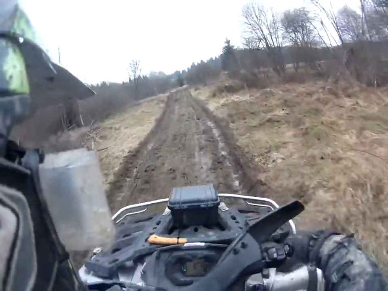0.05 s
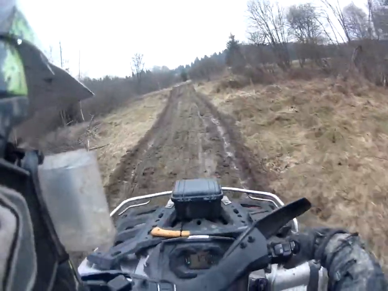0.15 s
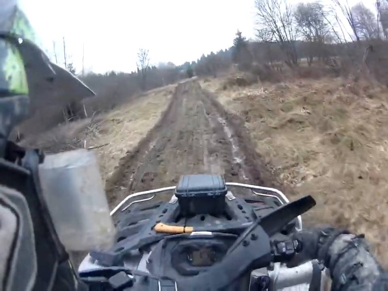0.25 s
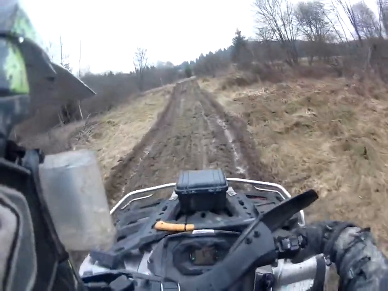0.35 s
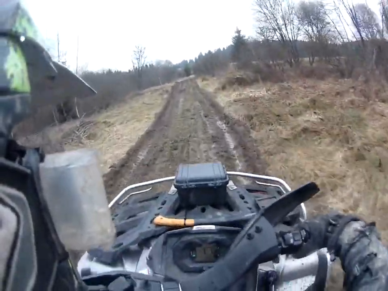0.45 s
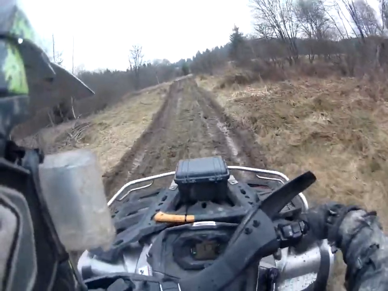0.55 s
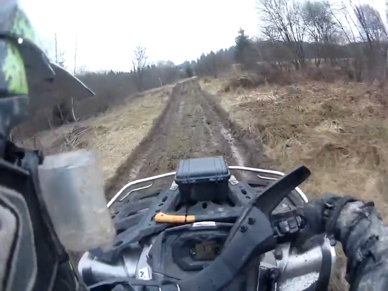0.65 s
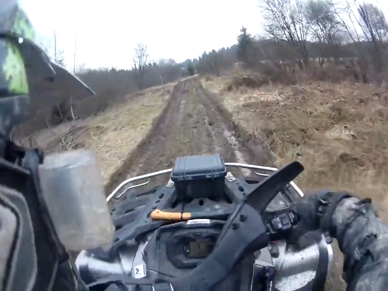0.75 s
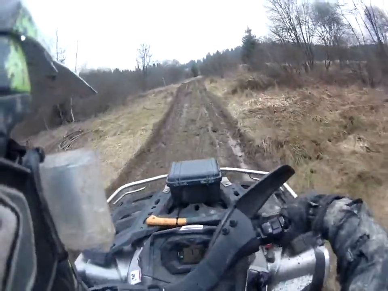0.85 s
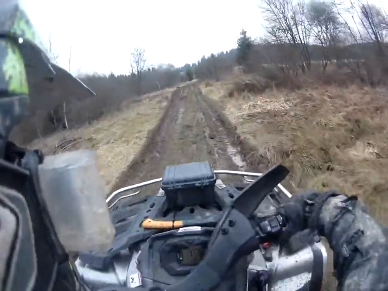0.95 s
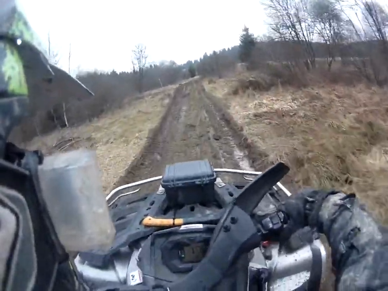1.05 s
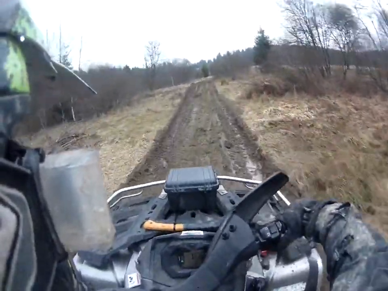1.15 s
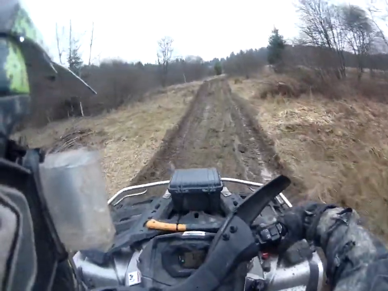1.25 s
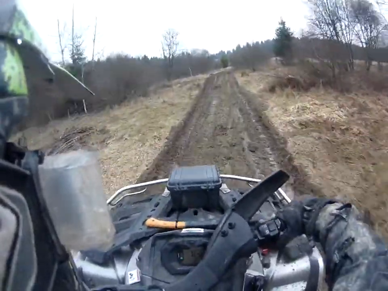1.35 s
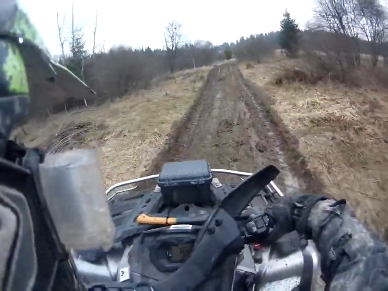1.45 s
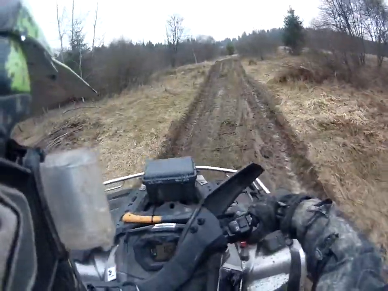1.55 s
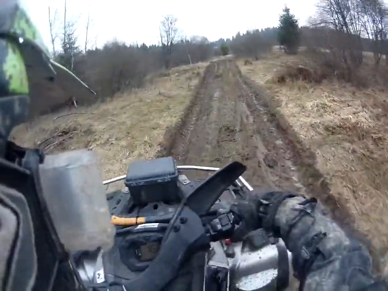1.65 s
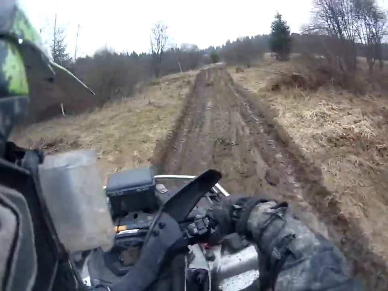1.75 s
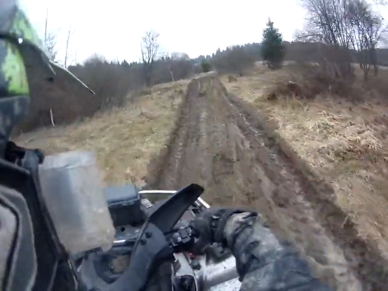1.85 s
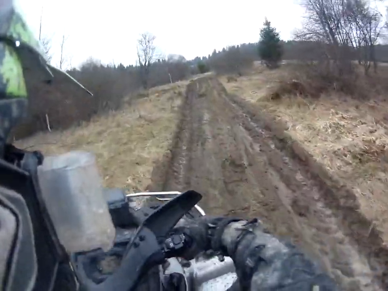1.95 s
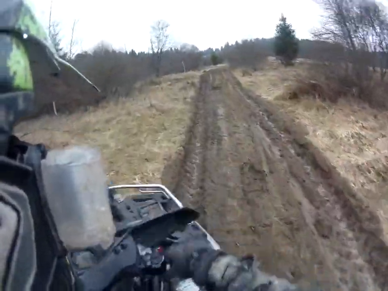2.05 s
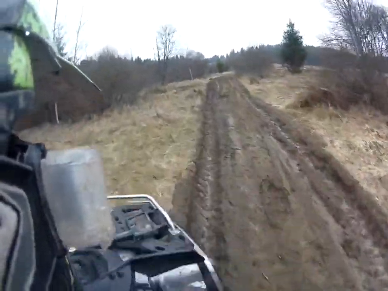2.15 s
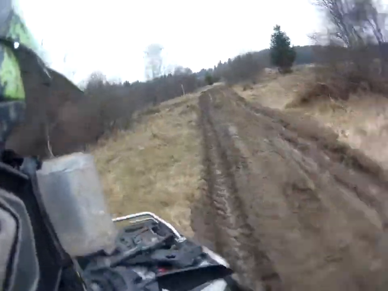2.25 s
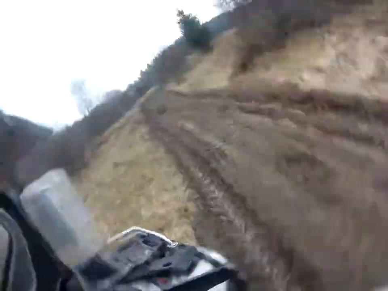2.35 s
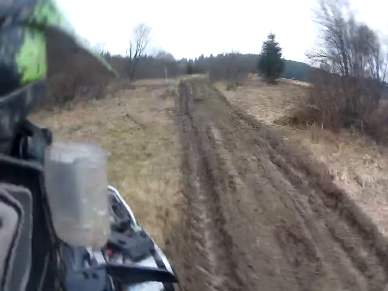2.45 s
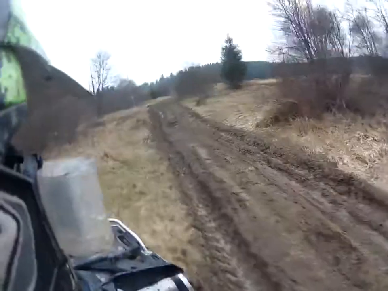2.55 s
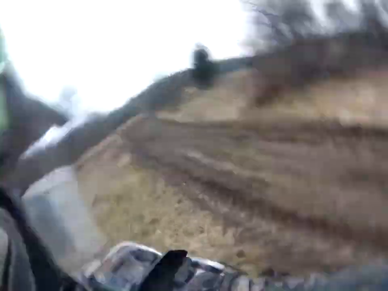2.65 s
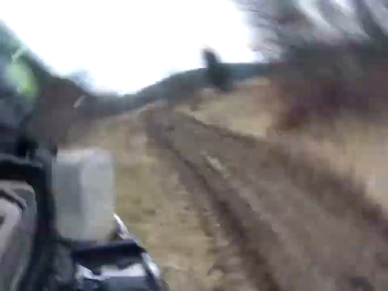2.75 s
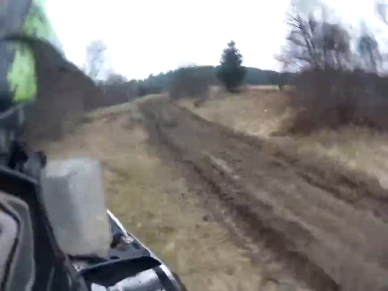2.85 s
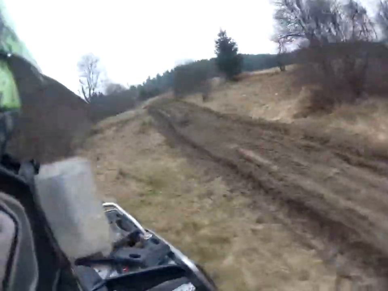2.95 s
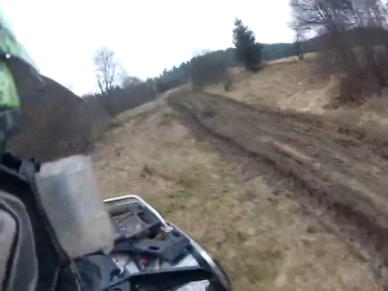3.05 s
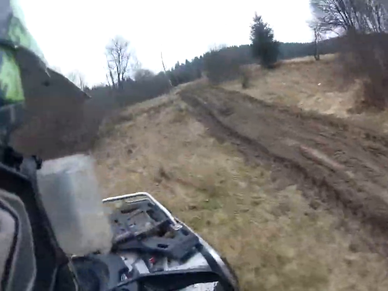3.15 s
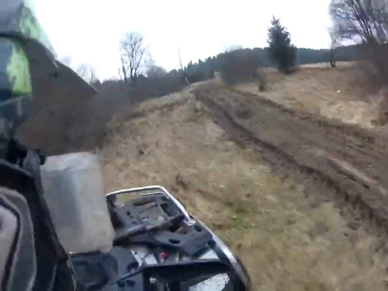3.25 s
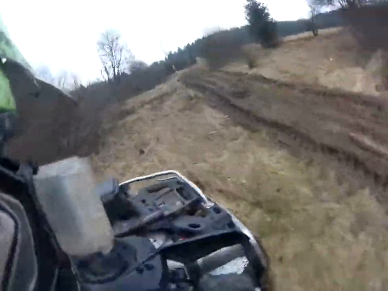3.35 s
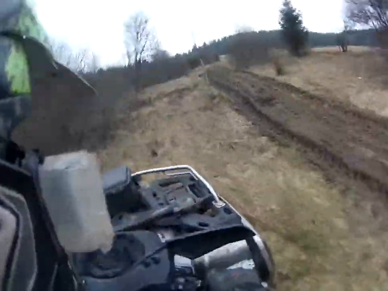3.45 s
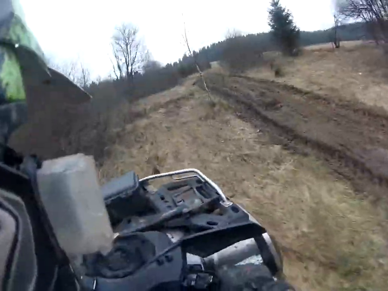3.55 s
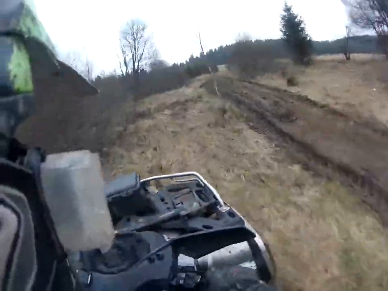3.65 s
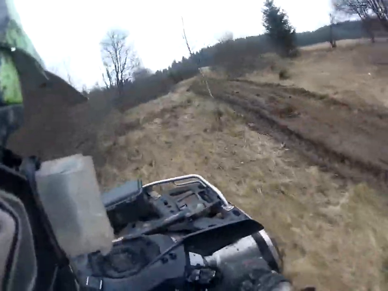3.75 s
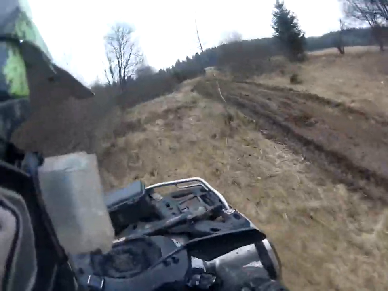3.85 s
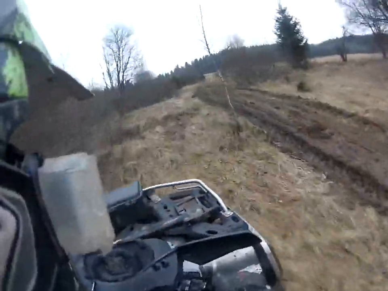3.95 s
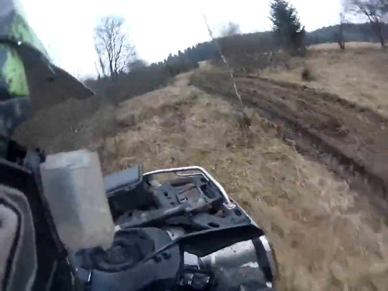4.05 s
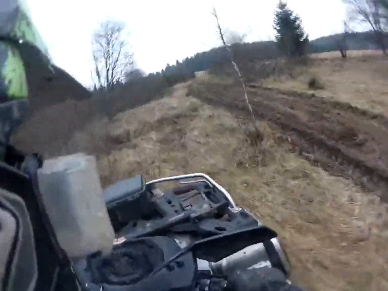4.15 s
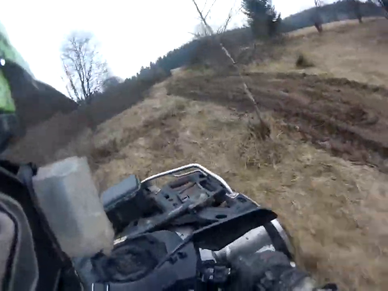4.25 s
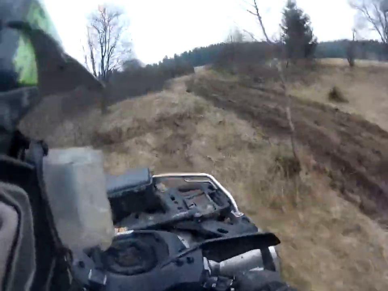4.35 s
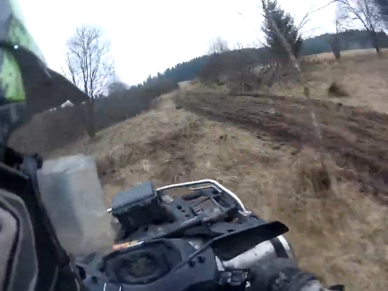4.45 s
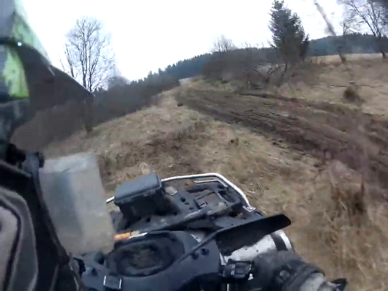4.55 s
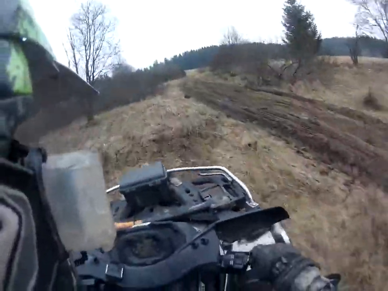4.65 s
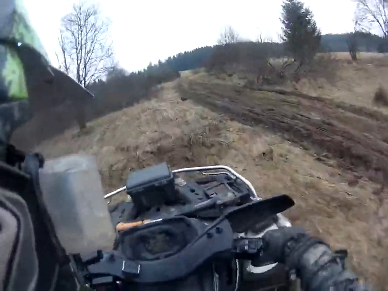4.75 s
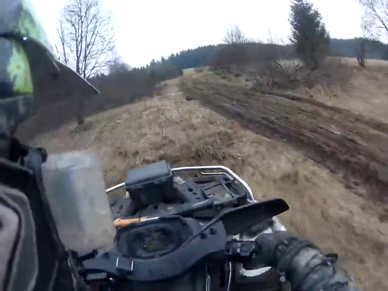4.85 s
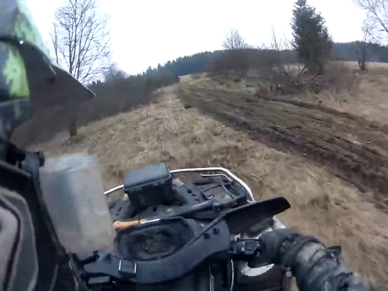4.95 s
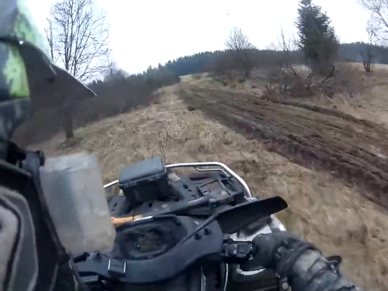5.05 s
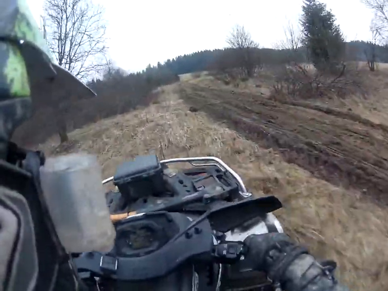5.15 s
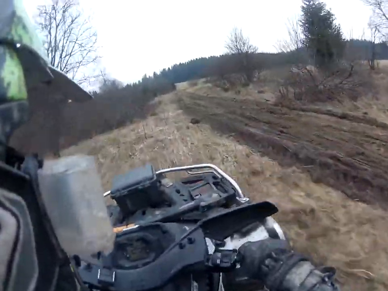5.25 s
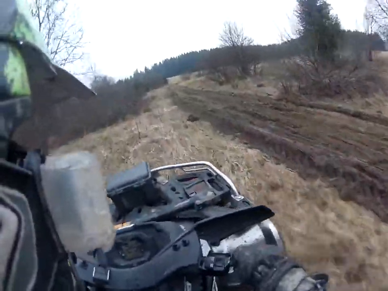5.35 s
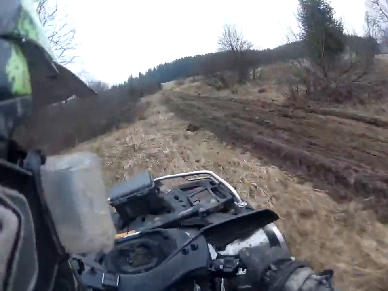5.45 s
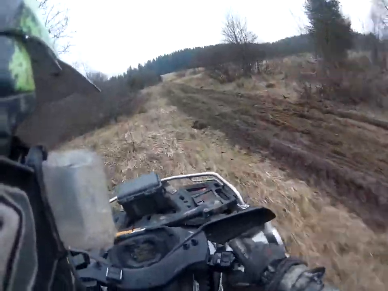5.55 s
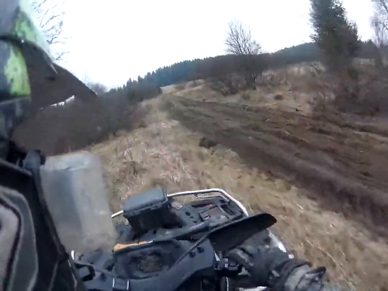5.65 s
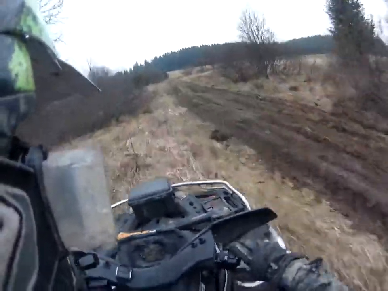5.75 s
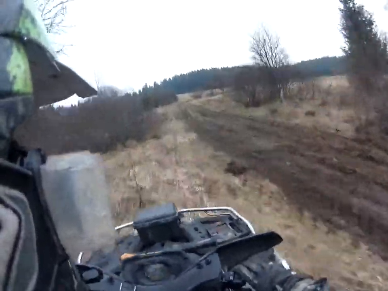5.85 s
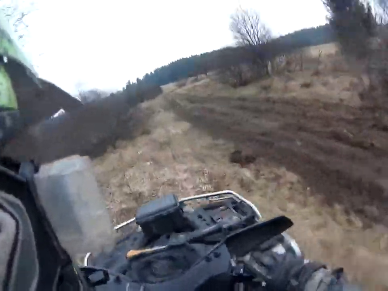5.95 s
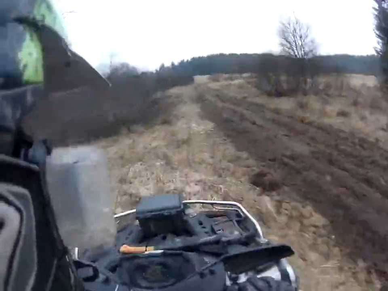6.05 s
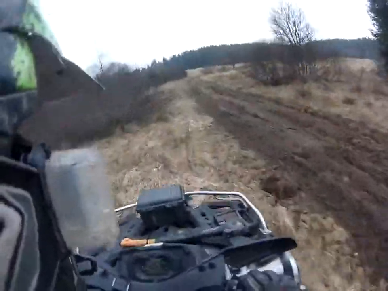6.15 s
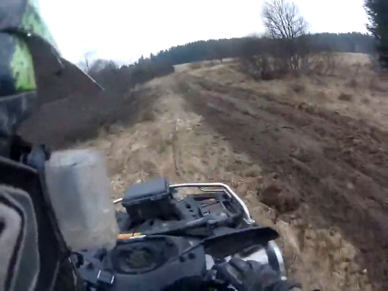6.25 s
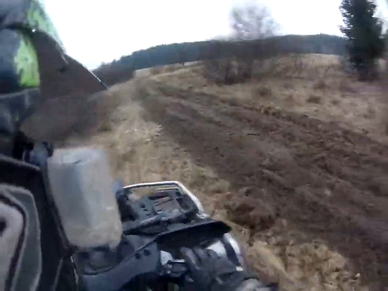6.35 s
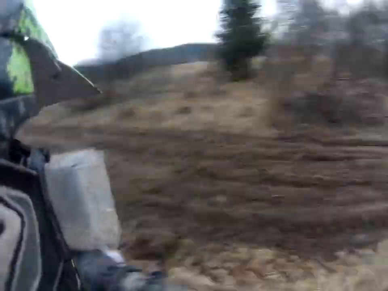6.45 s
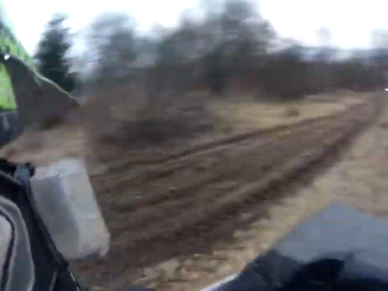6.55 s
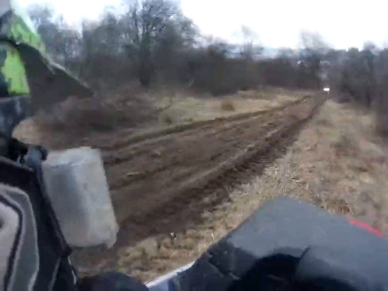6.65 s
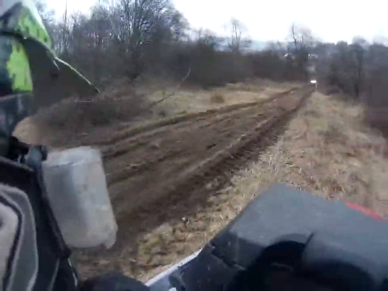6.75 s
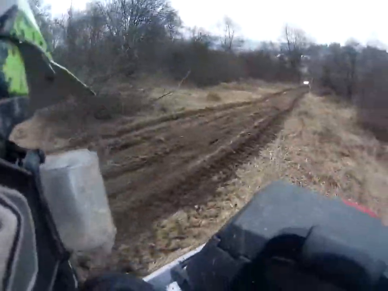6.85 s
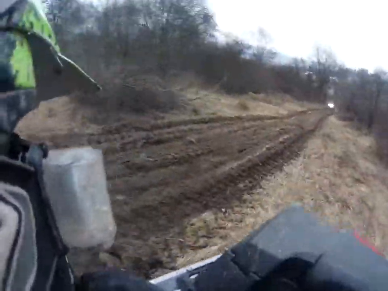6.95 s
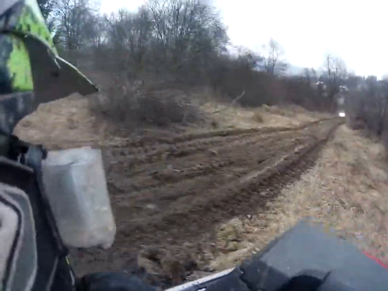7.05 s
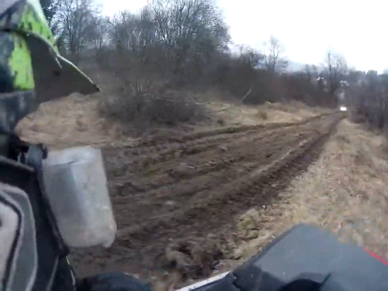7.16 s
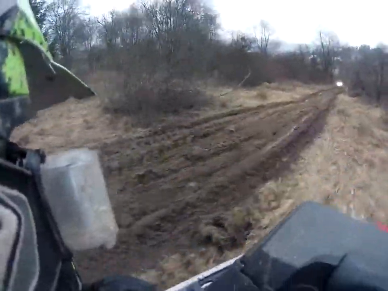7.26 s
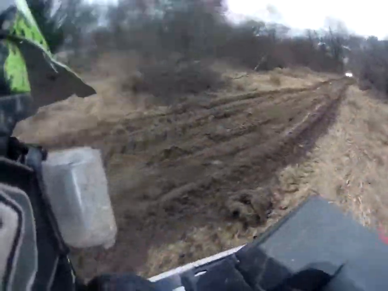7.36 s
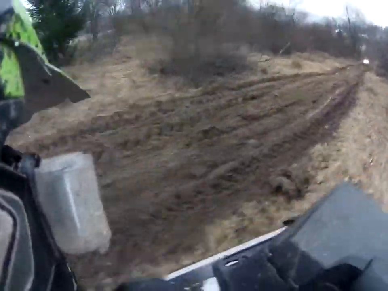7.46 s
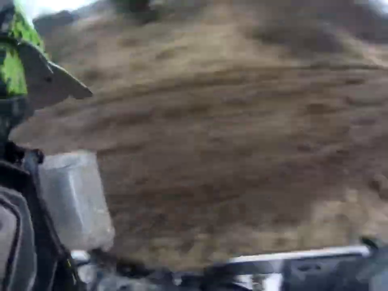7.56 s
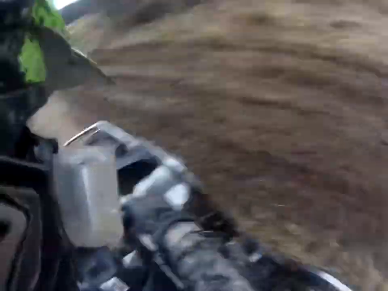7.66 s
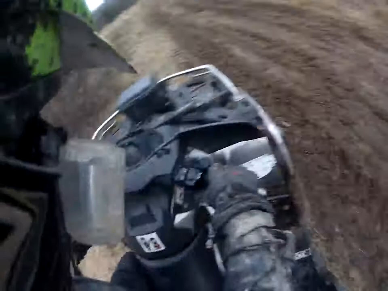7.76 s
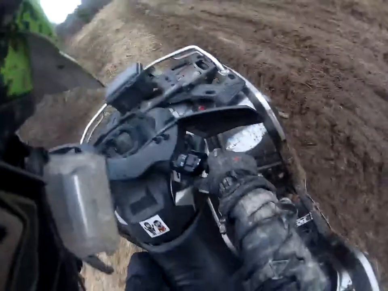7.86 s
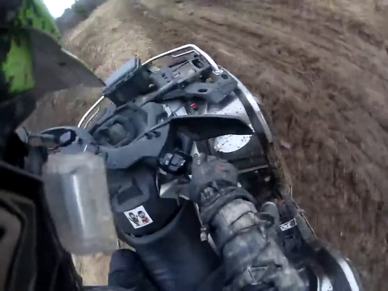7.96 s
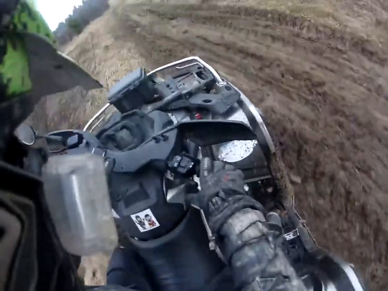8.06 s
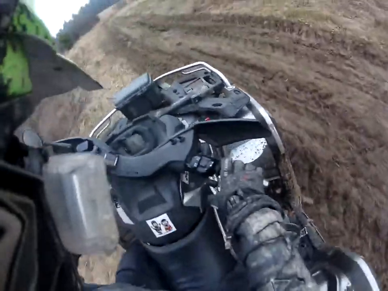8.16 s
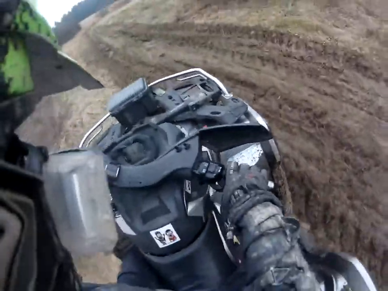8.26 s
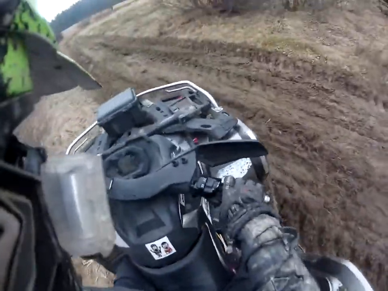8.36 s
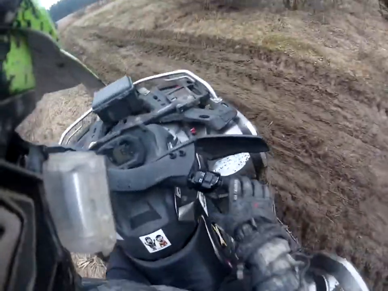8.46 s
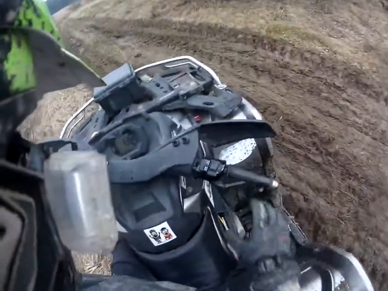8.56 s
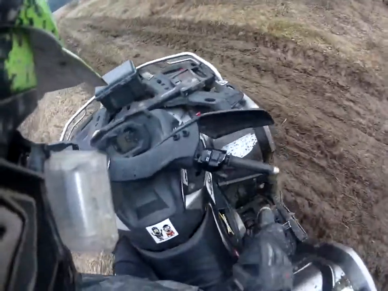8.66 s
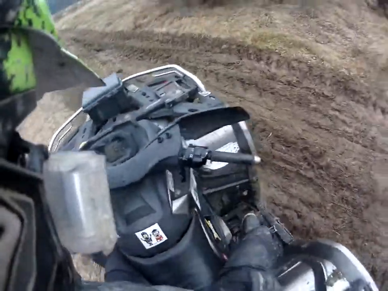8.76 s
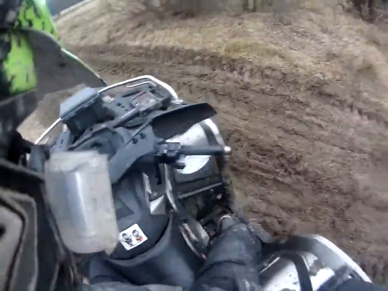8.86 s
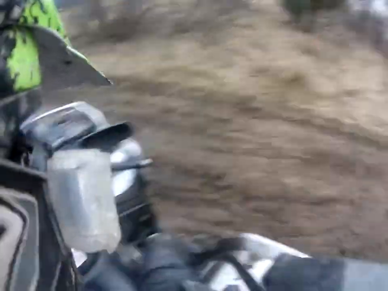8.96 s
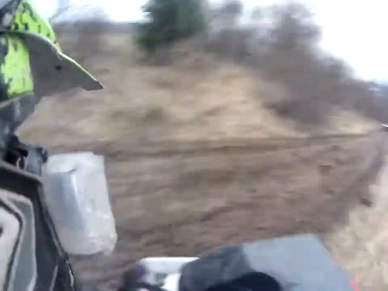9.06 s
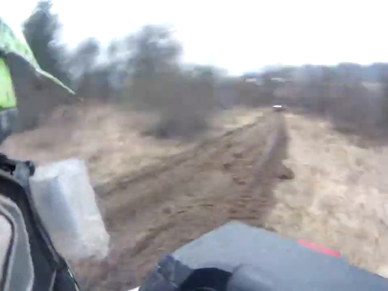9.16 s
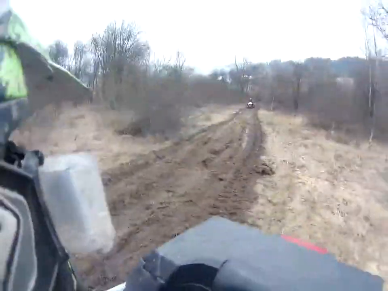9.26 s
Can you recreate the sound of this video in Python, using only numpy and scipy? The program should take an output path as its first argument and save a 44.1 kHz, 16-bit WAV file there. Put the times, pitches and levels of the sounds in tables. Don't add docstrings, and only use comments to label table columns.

```python
import sys
import numpy as np
from scipy import signal
from scipy.fft import irfft, next_fast_len
from scipy.io import wavfile
from scipy.ndimage import uniform_filter1d

SR = 44100
rng = np.random.default_rng(int(sys.argv[2]) if len(sys.argv) > 2 else 0)


def output_pcm(signal):
    pcm = np.clip(np.atleast_2d(signal).T, -1, 1) * 32767
    wavfile.write(sys.argv[1], SR, np.round(pcm).astype(np.int16))


def gain_from_decibels(decibels):
    exponent = np.asarray(decibels, float) / 20
    return 10 ** exponent


N = 410130
STEP = 16
TIME = np.arange(N) / SR
BLOW = 1500

# (t/s, f/Hz)
SPEED = [(0, 33.4), (1.1, 32.1), (2, 32.5), (2.8, 35), (3.15, 36.9), (3.5, 40.6), (4.3, 39.3), (4.9, 39.3),
         (5.2, 41), (5.4, 40.55), (5.9, 26.6), (6.6, 19.2), (6.9, 20.1), (7.15, 24.5), (7.77, 23.6),
         (8.15, 15.7), (8.5, 12.6), (9.3, 11.35)]


def evened(x):
    return x / np.sqrt(np.mean(abs(x) ** 2) + 1e-20)


def read(points, hz):
    f, value = np.transpose(points)
    return np.interp(np.log(hz + 1), np.log(f + 1), value)


def play(rows, t):
    s, *columns = np.transpose(rows)
    return [np.interp(t, s, c) for c in columns]


def wandering(t, per_unit=1):
    return np.interp(t, np.arange(1000) / per_unit, rng.standard_normal(1000))


def noise(colour):
    size = next_fast_len(N)
    hz = np.fft.rfftfreq(size, 1 / SR)
    top_hz = min(colour[-1][0], 15330)
    inside = (hz > colour[0][0]) & (hz < top_hz)
    a, b = rng.standard_normal((2, len(hz)))
    return evened(irfft((a + 1j * b) * gain_from_decibels(read(colour, hz)) * inside, size)[:N])


def converter_hiss():
    # (f/Hz, level/dB per Hz)
    hiss_colour = [(300, -14.5), (2000, -2), (4000, 1), (9000, 0.5), (12000, 1.5), (16500, -2)]
    return gain_from_decibels(-69.5) * np.array([noise(hiss_colour), noise(hiss_colour)])


def preamp_hiss():
    # (t/s, level/dB)
    card_writes = [(.52, -79), (1.22, -70), (1.52, -74), (1.72, -71), (2.02, -74), (3.22, -70), (3.72, -70),
                   (4.92, -70), (5.22, -76), (5.991, -73), (6.22, -72), (6.52, -77), (6.79, -76),
                   (7.02, -71), (7.22, -71), (7.52, -81), (7.8, -71), (8.1, -71), (8.22, -71), (8.63, -70),
                   (8.72, -75), (9.031, -70)]
    t = TIME[::STEP]
    bursts = sum(gain_from_decibels(db) * np.exp(-((t - s - .01) / 0.012) ** 4) for s, db in card_writes)
    level = gain_from_decibels(-67) + np.interp(TIME, t, bursts)
    colour = [(1500, -1.5), (3500, 3.5), (6000, -1.5), (9000, -3.0), (12000, -7.0), (16500, -7)]
    return level * noise(colour)


def electronic_whine():
    whine_hz, whine_db, frame_hz, frame_db = 10519, -76, 59.94, -22
    t = TIME[::STEP]
    frames = sum(2 * gain_from_decibels(frame_db) * np.cos(2 * np.pi * k * (frame_hz * t + k / 7)) for k in range(1, 7))
    swing = 1 + np.interp(TIME, t, frames)
    return np.sqrt(2) * gain_from_decibels(whine_db) * swing * np.sin(2 * np.pi * whine_hz * TIME)


def tones(rows, waver, flutter_db, per_s):
    out = np.zeros(N)
    fade_s, swell_db = .1, 2
    for start, end, first_hz, last_hz, db in rows:
        span = slice(max(round((start - fade_s) * SR), 0), round((end + fade_s) * SR))
        t = TIME[span]
        fade = np.interp(t, [start - fade_s, start, end, end + fade_s], [0, 1, 1, 0])
        hz = np.interp(t, [start, end], [first_hz, last_hz]) * (1 + waver * wandering(t, per_s))
        arch_db = -swell_db * (2 * (t - start) / (end - start) - 1) ** 2
        level = np.sqrt(2) * gain_from_decibels(db + arch_db + flutter_db * wandering(t, per_s))
        out[span] += level * fade * np.sin(2 * np.pi * np.cumsum(hz) / SR)
    return out


def hums():
    # (start t/s, end t/s, first f/Hz, last f/Hz, level/dB)
    hum_rows = [
        (4.3, 5.8, 354, 356, -55.5),
        (6, 6.5, 356, 354, -49),
        (6.6, 7.75, 353, 353, -53.5),
        (7.8, 8.9, 352, 352, -49.5),
        (9, 9.4, 352, 352, -57),
        (8.2, 8.8, 268, 272, -59),
        (8.85, 9.4, 276, 284, -54.5),
    ]
    return tones(hum_rows, waver=0.0024, flutter_db=0.46, per_s=40)


def buzzes():
    # (start t/s, end t/s, first f/Hz, last f/Hz, level/dB)
    buzz_rows = [(0, 0.18, 1344, 1340, -65), (.38, 0.68, 1340, 1330, -63), (.75, 1.1, 1314, 1314, -65),
                 (1.25, 1.6, 1355, 1380, -67), (1.3, 1.9, 1280, 1296, -62), (2.9, 3, 855, 863, -55.5),
                 (3.4, 4.9, 1312, 1320, -63.5), (5, 5.1, 1330, 1340, -58.5), (4.11, 4.14, 694, 675, -45),
                 (4.32, 4.34, 660, 673, -48), (8, 9.3, 520, 543, -64), (0, 1.8, 1325, 1360, -62.5),
                 (1.03, 1.08, 1323, 1335, -57), (3.7, 4.9, 1880, 1880, -66), (4.2, 5.15, 2480, 2430, -74),
                 (7.9, 8.4, 720, 724, -65.5)]
    return tones(buzz_rows, waver=.018, flutter_db=4, per_s=70)


def whines():
    # (start t/s, end t/s, first f/Hz, last f/Hz, level/dB)
    whine_rows = [(3.25, 3.37, 1555, 1565, -61), (3.42, 3.55, 1605, 1635, -63),
                  (3.62, 3.97, 1605, 1572, -60), (4.02, 4.1, 1575, 1620, -63), (4.8, 5.1, 1640, 1705, -61),
                  (5.15, 5.4, 1718, 1700, -57), (3.6, 3.85, 2400, 2390, -72), (4.24, 4.35, 2420, 2500, -70),
                  (4.45, 5.1, 2530, 2490, -71), (4.75, 4.95, 2400, 2410, -65.5),
                  (4.45, 4.75, 1730, 1725, -65), (3.45, 3.6, 1710, 1715, -65),
                  (7.36, 7.43, 1640, 1670, -66), (3.75, 5.45, 1850, 1875, -70)]
    return gain_from_decibels(0.5) * tones(whine_rows, waver=.0045, flutter_db=2.4, per_s=30)


def ring(modes, detune, rise):
    t = np.arange(BLOW) / SR
    x = np.zeros(BLOW)
    for (hz, db, t60), d in zip(modes, detune):
        x += gain_from_decibels(db - 60 * t / t60) * np.sin(2 * np.pi * hz * (1 + 0.025 * d) * t)
    x = x * (1 - np.exp(-(t / rise) ** 2))
    return x / abs(x).max()


def rubs():
    # (t/s, length/s, level/dB)
    rub_rows = [(2.358, 0.032, -58), (2.448, 0.024, -50), (2.567, 0.042, -71), (2.652, 0.075, -61),
                (2.704, 0.05, -58), (2.775, .03, -63), (2.807, 0.014, -54), (2.91, 0.021, -57),
                (4.392, .04, -72), (5.66, 0.063, -67), (7.62, .08, -74), (7.723, .09, -69),
                (9.126, 0.108, -67)]
    t = TIME[::STEP]
    stroke = 0
    for s, length, db in rub_rows:
        stroke = stroke + gain_from_decibels(db) * np.clip(np.minimum(t - s, s + length - t) / 0.0098, 0, 1)
    smooth = uniform_filter1d(uniform_filter1d(rng.standard_normal(N), size=70), size=30)
    grit = gain_from_decibels(2.6 * evened(smooth))
    colour = [(4300, -4), (5100, -8), (5650, 4), (6200, -4), (8200, -15), (9500, -19)]
    return np.interp(TIME, t, stroke) * evened(grit * noise(colour))


def clacks():
    # (peak level/dB, modes (f/Hz, level/dB, t60/s))
    clack_spots = [
        (-23, [(-2370, -1, .008), (2815, -1, .009), (-3550, 0, .009), (4950, 1, .008), (-5400, 0, .008)]),
        (-19, [(2730, -8, .007), (-3300, -1, .009), (3670, 0, .009), (-4650, 2, .009), (5190, -3, .008), (-5790, 0, .009), (7700, -6, .007), (-11700, -11, .003)]),
        (-21, [(-2200, 0, .009), (2800, 1, .007), (-3900, -2, .012), (4600, -1, .007), (-5300, -1, .007), (5900, 0, .008)]),
        (-26, [(7900, 0, .004), (-8600, -5, .004), (11800, -9, .003), (-13500, -9, .003)]),
        (-42, [(7700, 0, .008), (-5600, -2, .008)]),
        (-40, [(7900, 0, .004)]),
        (-21, [(1450, 0, .005), (1900, -5, .004)]),
        (-42, [(9500, 0, .005)]),
        (-33, [(2500, 0, .007), (-2000, -2, .007)]),
    ]
    clack_times = [2.4877, 2.8457, 2.8541, 7.4968, 2.8095, 4.381, 2.8438, 2.865, 2.5539]
    out = np.zeros(N + BLOW)
    for s, (db, modes) in zip(clack_times, clack_spots):
        out[round(s * SR):][:BLOW] += gain_from_decibels(db) * ring(modes, np.zeros(len(modes)), 0.0002)
    return out[:N]


def twigs():
    # (t/s, thud level/dB, knock level/dB, crack level/dB, tick level/dB)
    flank = [(2.339, -43, -52, -55, -47), (2.349, -50, -52, -55, -46), (2.3657, -47, -44, -44, -33.5),
             (2.44, -29, -39, -52, -52), (2.455, -35, -52, -48, -36), (2.4622, -20, -38, -44, -35),
             (2.4885, -28, -14.5, -50, -50), (2.4987, -20, -42, -42, -42), (2.5385, -36, -34, -52, -51),
             (2.5539, -24, -35, -45, -37), (2.572, -50, -50, -57, -46), (1.601, -43, -44, -55, -64),
             (2.125, -40, -46, -54, -60), (3.9155, -38, -38, -55, -65), (4.381, -47, -50, -44, -33),
             (4.4196, -48, -28.5, -53, -43), (5.543, -48, -41, -58, -62), (5.807, -50, -47, -57, -49),
             (5.914, -38, -47, -60, -65), (6.055, -43, -38.5, -56, -45), (6.713, -40, -41, -58, -65),
             (7.497, -43, -42, -42, -24.5)]
    # (t/s, thud level/dB, knock level/dB, crack level/dB, tick level/dB)
    lid = [(2.703, -36, -36, -45, -38), (2.720, -29, -35, -48, -29.5), (2.7725, -46, -48, -53, -35),
           (2.8013, -44, -29.5, -49, -55), (2.809, -55, -48, -55, -36), (2.8113, -45, -45, -55, -36),
           (2.8192, -31, -33, -50, -34), (2.828, -19, -24, -47, -34), (2.844, -32, -45, -50, -55),
           (2.8455, -22, -7, -26, -41), (2.8536, -17, -24, -50, -50), (2.865, -39, -49, -60, -30),
           (2.886, -20, -32, -57, -54), (2.9076, -41, -33, -42, -39)]
    # (f/Hz, level/dB, t60/s)
    flank_modes = [(-900, 2, 0.0021), (1270, 3, 0.0043), (-1550, -4.5, 0.0045)]
    # (f/Hz, level/dB, t60/s)
    lid_modes = [(880, 0, .010), (-1390, -2, .009), (-1800, -4, .009)]
    # (f/Hz, level/dB, t60/s)
    thud_modes = [(-107, -6, 0.011), (-360, 0, 0.02)]
    # (f/Hz, level/dB, t60/s)
    crack_modes = [(2250, -9, .008), (-2750, -4, .006), (-3350, 0, .007), (3750, -4, .005)]
    # (f/Hz, level/dB, t60/s)
    tick_modes = [(3600, -10, .003), (4900, 6, .004), (-5750, 12, .005), (-8150, -1, .004)]
    # (f/Hz, level/dB, t60/s)
    snap_modes = [(9200, -15, .003), (-12000, 2, 0.0022), (-14400, -4, .003), (15600, -11, .003)]
    out = np.zeros(N + BLOW)
    rattle = noise([(500, 2), (1100, -13), (1900, 0), (2300, -7), (3400, -3), (4200, -9), (5000, -3),
                    (7000, -22), (10000, -20)])
    rattle_fade = np.exp(-np.arange(BLOW) / SR / 0.0022)
    rows = [(*row, flank_modes) for row in flank] + [(*row, lid_modes) for row in lid]
    chances = rng.uniform(-1, 1, (len(rows), 18))
    for (s, thud_db, knock_db, crack_db, tick_db, modes), chance in zip(rows, chances):
        start = round(s * SR)
        snap_db = tick_db - 20.0 + 0.43 * (tick_db - knock_db)
        blow = gain_from_decibels(thud_db) * ring(thud_modes, chance[16:], 0.0004)
        blow += gain_from_decibels(knock_db) * ring(modes, chance, 0.00027)
        blow += gain_from_decibels(crack_db) * ring(crack_modes, chance[12:], 0.00013)
        blow += gain_from_decibels(snap_db) * ring(snap_modes, chance[8:], 0.000078)
        blow += gain_from_decibels(tick_db) * ring(tick_modes, chance[4:], 0.00028)
        blow += gain_from_decibels(knock_db - 21) * rattle[start:][:BLOW] * rattle_fade
        out[start:][:BLOW] += blow
    return out[:N]


def speed(t):
    # (t/s, speed change f/Hz, half length/s)
    speed_swings = [(0, -.6, .05), (.6, .45, .25), (.92, .25, .08), (1.1, -.3, .07), (1.8, .25, .2), (2, -.3, .05),
                    (2.2, 2.3, .09), (2.4, -1.2, .07), (2.54, 1.2, .07), (2.72, -.7, .06), (2.92, 1.2, .09),
                    (3.12, -.4, .05), (3.37, .5, .1), (3.7, -.4, .06), (4, -.6, .06), (4.1, .8, .06),
                    (6.15, .9, .25), (7.43, -1.6, .17), (7.84, 1.1, .05), (7.92, -1, .04), (8.04, 1.1, .05),
                    (8.3, -.4, .1)]
    return play(SPEED, t)[0] + sum(hz * np.exp(-((t - s) / half) ** 2) for s, hz, half in speed_swings)


def crank():
    jolts = .15 * wandering(TIME, 12)
    hz = np.interp(TIME, TIME[::STEP], speed(TIME[::STEP]))
    return .75 + np.cumsum(hz + jolts) / SR


def roar(turns):
    # (t/s, level/dB against full pull)
    load_rows = [(0, -1), (.6, -2), (1.06, -3), (1.76, -5), (2.02, -5), (2.33, -2.5), (2.56, -3), (3, -2.5),
                 (3.47, 0), (4.35, -1), (5.28, 1.5), (5.49, -0.5), (5.75, -3.5), (6.47, -9.5), (7.46, -9),
                 (7.85, -6), (8.3, -10.5), (9.3, -12.5)]
    # (f/Hz, level/dB per Hz)
    roar_colour = [(12, -22), (35, -13), (70, -7), (130, -6), (250, -4), (400, -3), (500, -7), (860, -10.5),
                   (1200, -19), (1700, -40)]
    # (f/Hz, level/dB per Hz)
    clatter_colour = [(530, -37), (900, -9.5), (1470, -5), (1650, -6), (2180, -12.5), (2460, -13),
                      (3020, -20.5), (4200, -34), (5460, -58), (9240, -120)]
    # (f/Hz, level/dB per Hz)
    case_ring = [(3300, -29), (4200, -12), (5000, -4), (5450, -4), (6150, -2), (6600, -10), (7200, -17),
                 (10000, -17.5)]
    load = play(load_rows, TIME)[0] + 1.07 * wandering(turns)
    slowing = play(SPEED, TIME)[0] - 40
    puff = np.exp(-(turns % 1) / 0.81) + np.exp(-((turns - 3 / 8) % 1) / 0.13)
    puff = uniform_filter1d(puff, size=40)
    out = np.zeros(N)
    for db, slope, per_hz, colour, depth in [(-39.5, 0.99, 0.081, roar_colour, 0.31),
                                             (-54, 1, -0.021, clatter_colour, 0.29),
                                             (-64, 0.93, 0.16, case_ring, 0.59)]:
        out += gain_from_decibels(db + slope * load + per_hz * slowing) * noise(colour) * evened(1 + depth * puff)
    return out


def causal(colour):
    log_gain = np.log(gain_from_decibels(read(colour, abs(np.fft.fftfreq(4096, 1 / 4096)))))
    return np.exp(np.conj(signal.hilbert(log_gain)))


def exhaust(turns):
    # (t/s, 0 cruise 1 pull 2 coast 3 blip 4 idle)
    state_rows = [(0, 0), (2, 0), (3.15, .15), (3.5, 1), (5.42, 1), (5.54, 2), (6.48, 2), (6.66, 3),
                  (7.85, 3), (7.97, 2.55), (8.15, 2.45), (8.36, 4), (9.3, 4)]
    # (t/s, exhaust level/dB at the pipe's main resonance, intake bark level/dB on the upper orders)
    exhaust_rows = [(0, -37.5, 0), (.35, -35.5, -2), (1.9, -37, -2.5), (2.6, -32.5, -5), (2.98, -30.5, -5),
                    (3.6, -30.5, 0), (4.2, -33.5, -0.5), (5.1, -30, -0.5), (5.4, -29.5, -1.5),
                    (5.52, -42, 1.5), (5.76, -38.5, 0), (6, -41, 0), (6.57, -50, -4.5), (6.9, -46.5, 4.5),
                    (7.8, -45.5, -2.5), (8.03, -50.5, -4.5), (8.2, -57, -0.5), (9.3, -58, 0.5)]
    # (f/Hz, level/dB)
    pipe_colour = [(20.0, -37), (40.0, -5), (62.0, -2.5), (80.0, -0.5), (97.0, -0.5), (120.0, -8),
                   (150.0, -16), (190.0, -9.5), (235.0, -9), (290.0, -15), (340.0, -16.5), (400.0, -16.5),
                   (520.0, -21.5), (1000.0, -39.5)]
    # (order, level/dB in cruise, pull, coast, blip, idle)
    order_trim = [(1, -4.5, -9, -1, -2, 5), (2, -9.5, -8, -5.5, -3.5, 5), (3, -14, -8, 0, -10, -4),
                  (4, 5, 14.5, 7, 17, 9), (5, 2, -2.5, -3.5, 7.5, 4), (6, 2, 1, 1.5, 0.5, -1),
                  (7, 2, -5, 6, 5, 0), (8, -5, -2, -2, -5, 9), (9, 8.5, 6, 5.5, 10, 11),
                  (10, 6, 3, 0, 1.5, -5), (11, -4, -3.5, -2, 0.5, -2), (12, 16.5, 9, 18.5, 20, 3),
                  (13, -0.5, -5.5, -1.5, -15, 2), (14, -8, -4.5, -2.5, 3, 0), (15, 7, -2, 5, 9.5, 1),
                  (16, -6.5, -3, -3.5, -5, 6)]
    second_cylinder = [.75, .75, .8, .9, 1.25]
    roughness = [1.5, 1.4, 4, 1.1, 1]
    lateness = [.005, .005, .015, .002, .003]
    t, states = TIME[::STEP], np.arange(5)
    state = play(state_rows, t)[0]
    level_db, bark_db = play(exhaust_rows, t)
    order = np.arange(1, 49)[:, None]
    hz = np.minimum(order * speed(t), 2000)

    pipe = np.interp(hz, np.arange(4096), causal(pipe_colour)) * (hz < pipe_colour[-1][0])
    pipe[:len(order_trim)] *= gain_from_decibels(np.array([np.interp(state, states, row[1:]) for row in order_trim]))
    bumps = np.array([wandering(t, 7) for _ in order])
    upper = np.clip((hz - 130) / 60, 0, 1)
    pipe *= gain_from_decibels(np.minimum(.5 * order, 1.8) * bumps + bark_db * upper)

    twin = 1 + np.interp(state, states, second_cylinder) * np.exp(-2j * np.pi * order * 3 / 8)
    late = .006 * np.maximum(hz - 130, 0) + .036 * order * rng.uniform(-1, 1, order.shape)
    twin *= np.exp(-2j * np.pi * late)

    cycle = turns[::STEP]
    drift = np.array([wandering(cycle) + 1j * wandering(cycle) for _ in order])
    smear = np.minimum(.025 + .012 * order, .24)
    rough = np.interp(state, states, roughness) * smear
    cycle = cycle + np.interp(state, states, lateness) * wandering(cycle)
    lines = (pipe * twin * (1 + rough * drift) * np.exp(2j * np.pi * order * cycle)).real.sum(0)
    pressure = -np.sqrt(2) * gain_from_decibels(level_db) * lines
    return signal.resample_poly(pressure, STEP, 1, window=("kaiser", 4 * np.pi))[:N]


def scene():
    turns = crank()
    mono = hums() + buzzes() + whines()
    mono += rubs() + clacks() + twigs()
    mono += roar(turns) + exhaust(turns)
    return np.array([mono, mono])


def low_pass(x):
    return signal.sosfilt(signal.butter(12, 15380, fs=SR, output="sos"), x)


def record(dry):
    shared = preamp_hiss() + electronic_whine()
    return low_pass(dry + shared + converter_hiss())


dry = scene()
out = record(dry)
output_pcm(out)
```